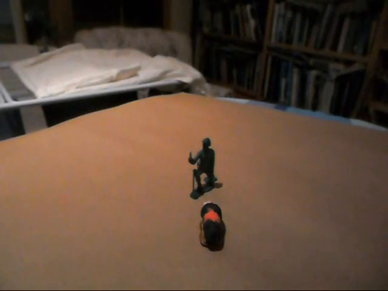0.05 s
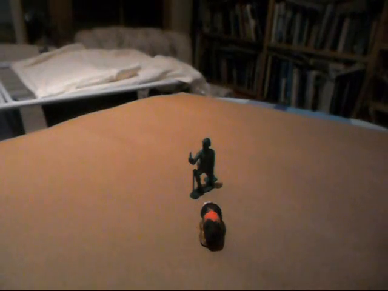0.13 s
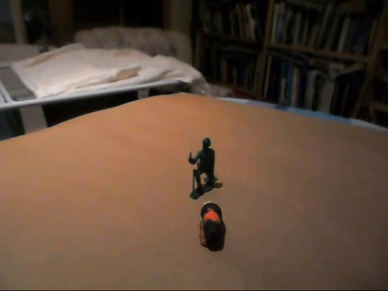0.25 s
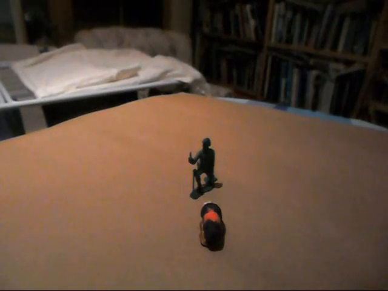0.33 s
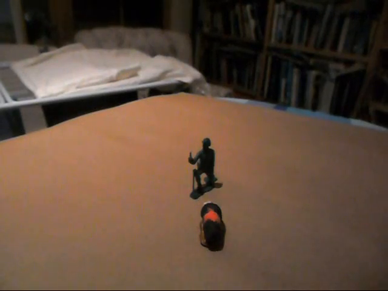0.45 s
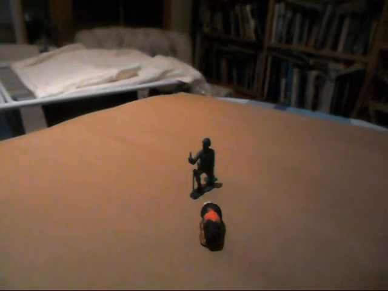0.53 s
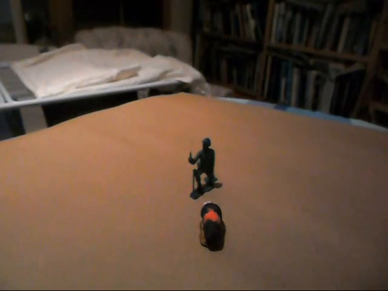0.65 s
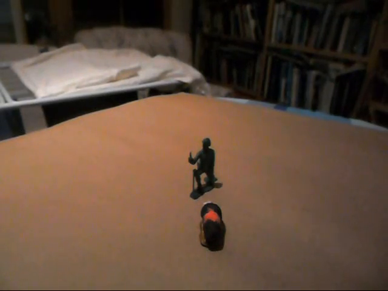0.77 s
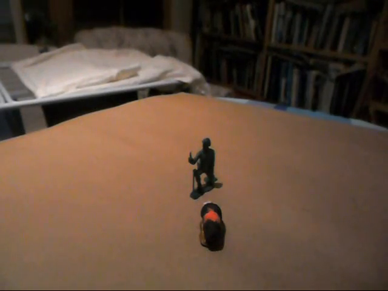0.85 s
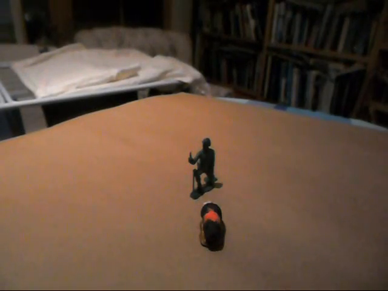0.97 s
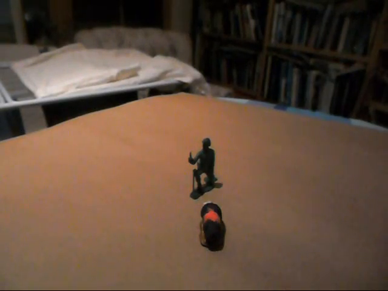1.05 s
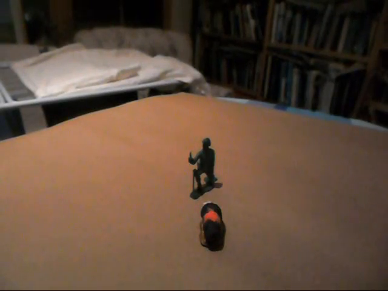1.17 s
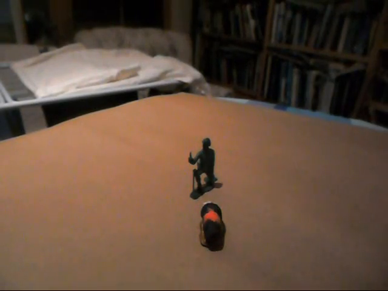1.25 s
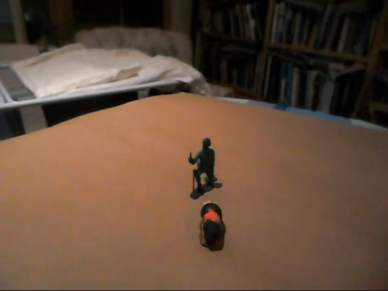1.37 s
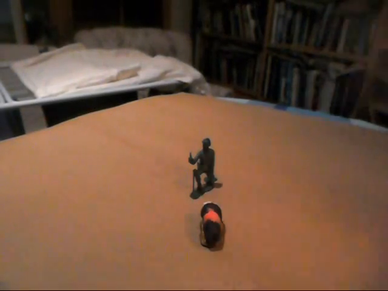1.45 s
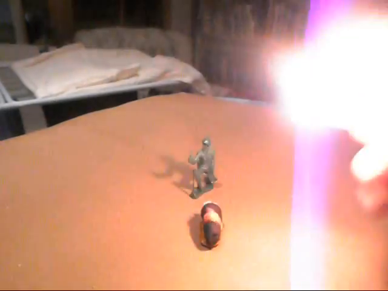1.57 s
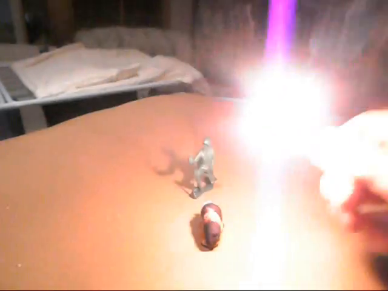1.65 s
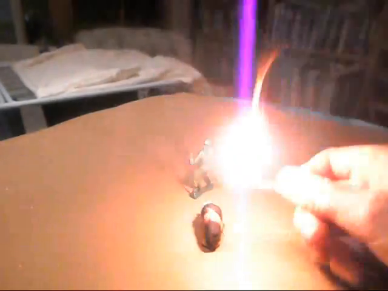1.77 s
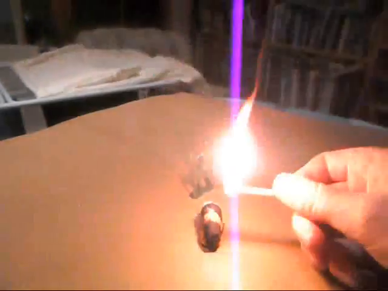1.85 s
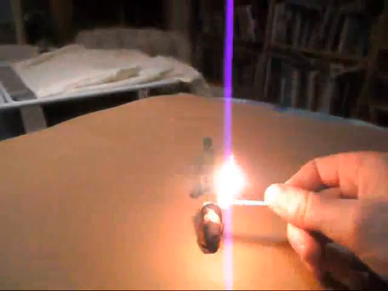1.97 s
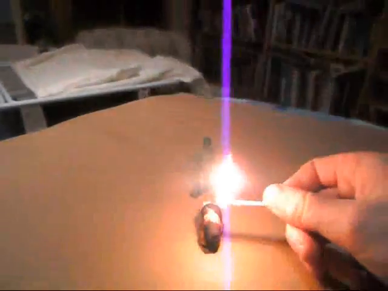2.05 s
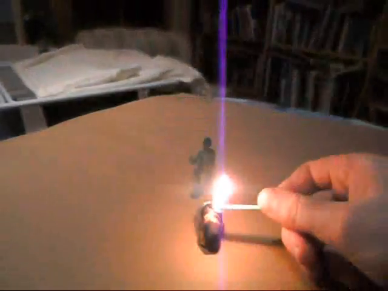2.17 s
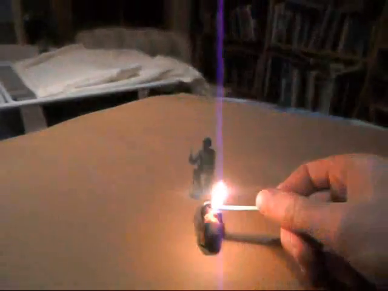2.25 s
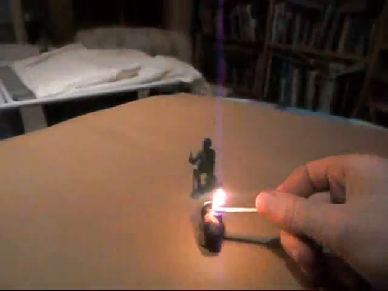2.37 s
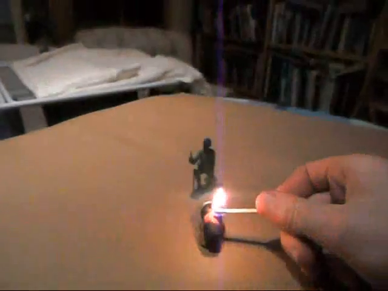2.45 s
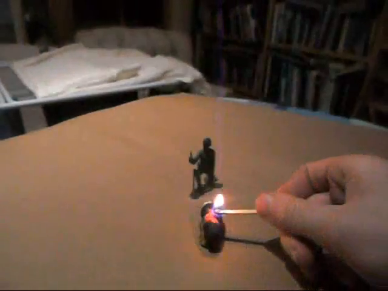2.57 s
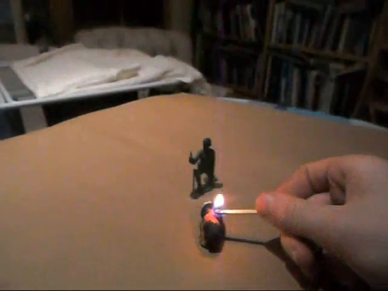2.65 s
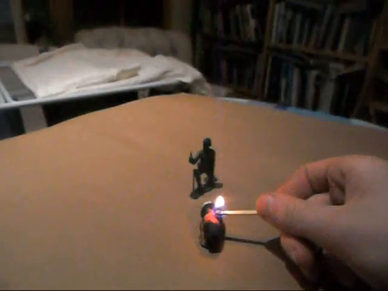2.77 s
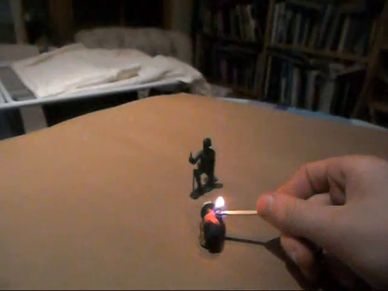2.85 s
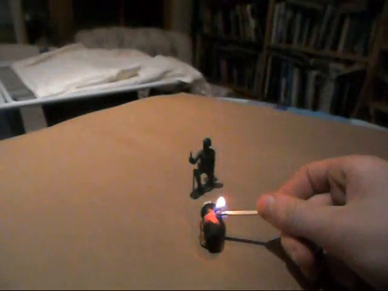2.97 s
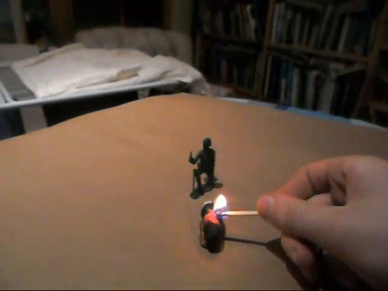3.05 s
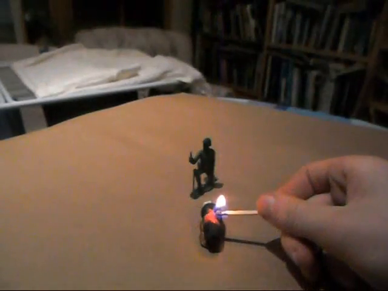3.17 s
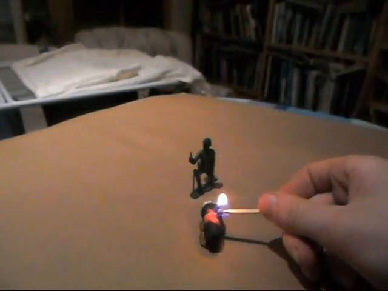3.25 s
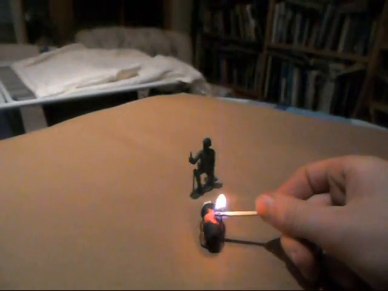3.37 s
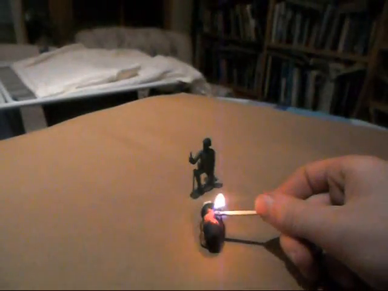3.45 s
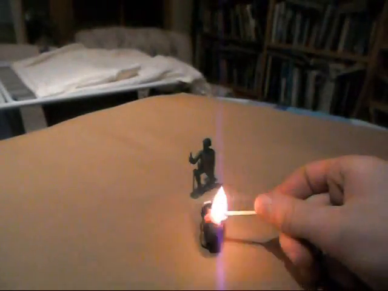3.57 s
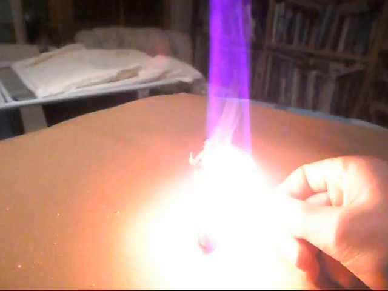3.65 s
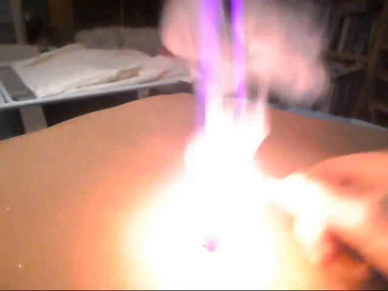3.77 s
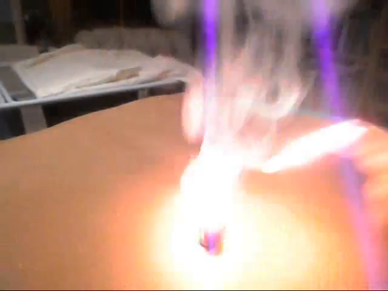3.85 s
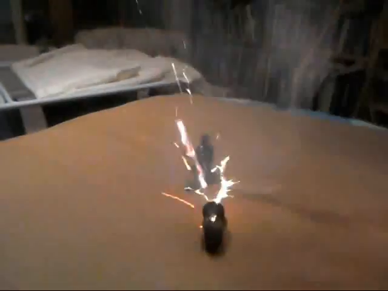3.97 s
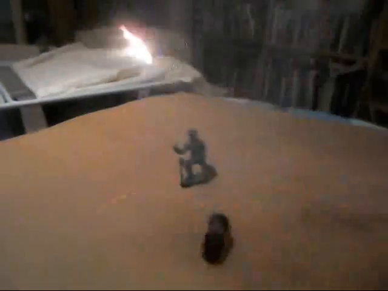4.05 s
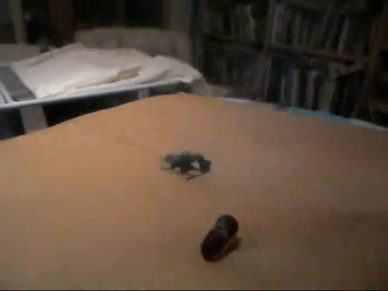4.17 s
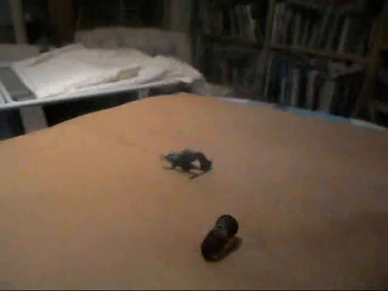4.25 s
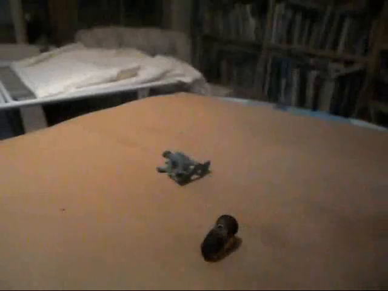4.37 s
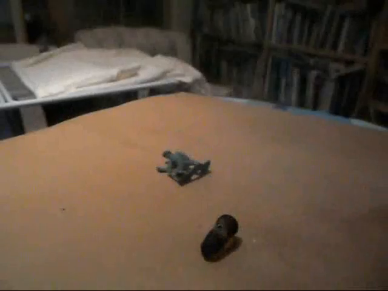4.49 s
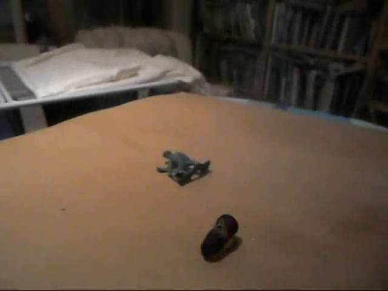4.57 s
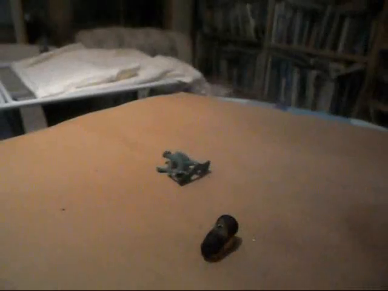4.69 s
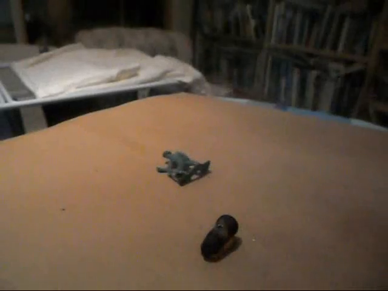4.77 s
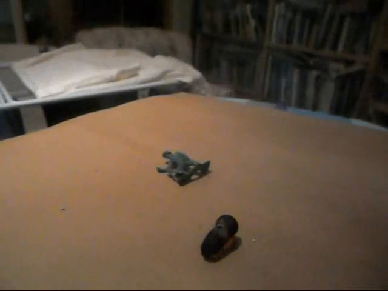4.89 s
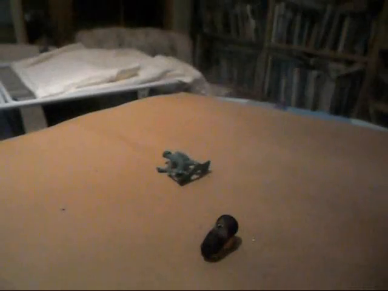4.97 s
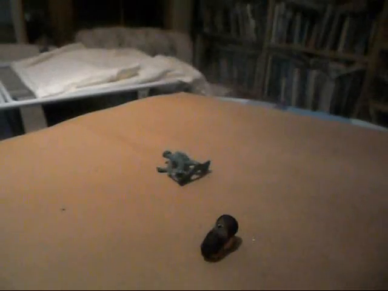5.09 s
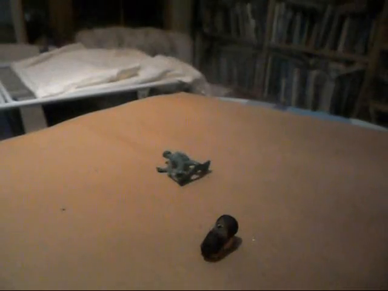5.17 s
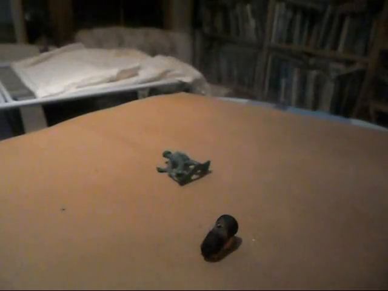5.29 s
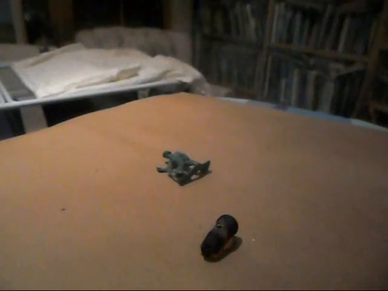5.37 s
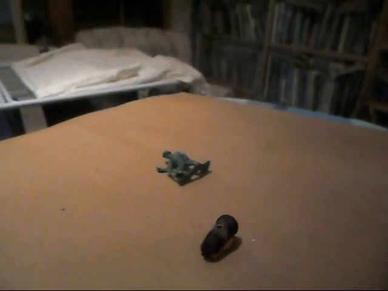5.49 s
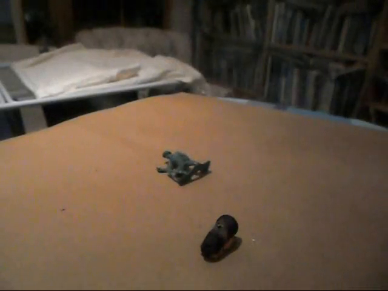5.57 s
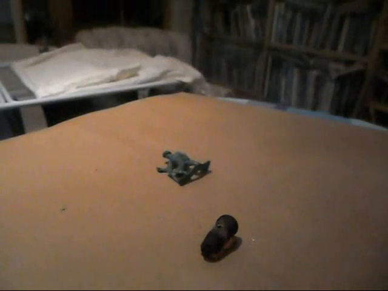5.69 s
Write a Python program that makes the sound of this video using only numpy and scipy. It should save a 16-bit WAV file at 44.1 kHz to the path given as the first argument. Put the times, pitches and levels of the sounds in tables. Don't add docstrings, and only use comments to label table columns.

```python
import sys
import numpy as np
from scipy import signal
from scipy.io import wavfile
from scipy.ndimage import uniform_filter1d

SR = 44100
rng = np.random.default_rng(int(sys.argv[2]) if len(sys.argv) > 2 else 0)


def put_to_file(sound):
    columns = np.atleast_2d(sound).T
    safe = np.clip(columns, -1, 1)
    whole_steps = np.round(safe * 32767)
    wavfile.write(sys.argv[1], SR, whole_steps.astype(np.int16))


def ratio(d):
    e = np.asarray(d, float) / 20
    return 10 ** e


N = 252693
T = np.arange(N) / SR
SHOT_S = 4.07183


def evened(x):
    return x / np.sqrt(np.mean(x ** 2) + 1e-20)


def read(points, hz):
    f, value = np.transpose(points)
    return np.interp(np.log(hz + 1), np.log(f + 1), value)


def along(rows, k, off=-120.):
    rows = np.array(rows)
    return np.interp(T, rows[:, 0], rows[:, k], off, off)


def colour(x, points):
    level = np.log(ratio(read(points, abs(np.fft.fftfreq(4096, 1 / SR)))))
    taps = np.fft.ifft(np.exp(np.conj(signal.hilbert(level)))).real[:2048]
    return signal.oaconvolve(x, taps / np.linalg.norm(taps))[:N]


def resonate(x, hz, width):
    turn = np.exp(2j * np.pi * np.cumsum(hz * np.ones(len(x))) / SR)
    r = np.exp(-np.pi * width / SR)
    return 2 * (turn * signal.lfilter([1 - r], [1, -r], x / turn + 1e-18)).real


def turbulence(lumpy_db, lump_s):
    lumps = uniform_filter1d(rng.standard_normal(N), max(2, round(lump_s * SR)))
    return evened(rng.standard_normal(N) * ratio(lumpy_db * evened(lumps)))


def crackles(per_s, spread_db):
    chance, size = rng.random(N), rng.exponential(1, N)
    sign = rng.choice([-1., 1.], N)
    return (chance < per_s / SR) * sign * ratio(spread_db * np.minimum(size, 2.5))


def sizzle(edge_hz, lumpy_db):
    high_pass = signal.butter(3, edge_hz, "high", fs=SR)
    return evened(signal.lfilter(*high_pass, turbulence(lumpy_db, 0.006)))


def patchy(x, patch_db, wide_hz, long_s):
    z = signal.stft(x, nperseg=512, noverlap=384)[2]
    field = uniform_filter1d(rng.standard_normal(z.shape), max(1, round(wide_hz * 512 / SR)), axis=0)
    field = evened(uniform_filter1d(field, max(1, round(long_s * SR / 128)), axis=1))
    return evened(signal.istft(z * ratio(patch_db * field), nperseg=512, noverlap=384)[1][:len(x)])


def effort(start, top, end, db, power=1.38):
    release_db = -24.5
    rise = np.clip((T - start) / (top - start), 0, 1) ** power
    return rise * ratio(db + release_db * np.maximum(T - top, 0) / (end - top)) * (T < end)


def add(mix, s, sound):
    part = mix[round(s * SR):][:len(sound)]
    part += sound[:len(part)]


def noise_floor():
    # frequency in Hz, level in dB per Hz.
    hiss_tone = [(12, -30.5), (20, 1.5), (38, 0.5), (65, -3.5), (178, -7), (214, -6.5), (293, -7),
                 (471, -10), (7470, -20.5), (9980, -22), (10800, -23), (14000, -64.5), (22000, -120)]
    hiss_db, duck_db, sink_db_per_s = -53.5, -15, -0.25
    gain_db = np.clip((T - SHOT_S) / .02, 0, 1) * (duck_db + sink_db_per_s * (T - SHOT_S))
    return ratio(hiss_db + gain_db) * colour(turbulence(0.43, 0.03), hiss_tone)


def thuds():
    # start in seconds, peak in dB, ring in Hz, t60 in seconds.
    knocks = [
        (1.2473, -30, 290, 0.035),
        (1.849, -41, 114, 0.082),
        (4.264, -38, 90, 0.027),
        (4.282, -49.5, 88.5, 0.051),
        (4.45, -54, 79.6, 0.037),
    ]
    out, t = np.zeros(N), np.arange(4000) / SR
    for s, db, hz, t60 in knocks:
        add(out, s, ratio(db - 60 * t / t60) * np.sin(2 * np.pi * hz * t))
    return out


def snaps():
    # start in seconds, peak in dB, ring in Hz, t60 in seconds.
    clicks = [(0.014, -15, 2520, 0.0068), (0.022, -22.5, 2430, 0.0069), (0.342, -43.5, 2280, 0.017),
              (0.367, -43.5, 2300, 0.019), (0.806, -36, 1050, 0.0093), (1.246, -23.5, 1246, 0.05),
              (1.2488, -23.5, 1080, 0.018), (1.267, -48, 830, 0.012), (3.474, -48, 751, 0.01),
              (4.429, -54, 584, 0.0118), (4.799, -56, 595, 0.012), (4.993, -53, 798, 0.014),
              (5.69, -52.5, 622, 0.016), (5.724, -57, 1000, 0.012), (1.064, -35, 760, 0.0066)]
    edge_level = 0.48
    out, t = np.zeros(N), np.arange(4000) / SR
    for s, db, hz, t60 in clicks:
        edge = resonate(rng.standard_normal(4000), 0.43 * hz, 5000) * ratio(-60 * t / .012)
        ring = -np.sin(2 * np.pi * hz * t) + edge_level * edge
        ring += 0.34 * np.sin(2 * np.pi * 2.4 * hz * t)
        ring += 0.33 * np.sin(2 * np.pi * 1.5 * hz * t)
        add(out, s, ratio(db - 60 * t / t60) * ring * np.minimum(t / 0.0003, 1))
    return out


def matchbox():
    # hardest moment in seconds, rise in seconds, pressure in dB,
    # panel in Hz, freedom of the panel from 0 to 1.
    strokes = [
        (.862, 0.019, -39.5, 1060, 1),
        (1.082, 0.025, -42.5, 941, .66),
        (1.238, .082, -31, 1335, 0.7),
    ]
    # start, hardest moment and end in seconds, pressure in dB, share of rasp from 0 to 1.
    slides = [
        (-.02, 0.0, .12, -38, .35),
        (.143, 0.204, 0.36, -44, .95),
    ]
    # frequency in Hz, width in Hz, level in dB.
    hollows = [(450, 180, -6), (750, 250, -8), (2200, 350, 0), (3200, 600, -6)]
    # frequency in Hz, level in dB per Hz.
    rasp_tone = [(290, -40.5), (500, -9.5), (946, -12), (1940, -6), (2160, -7), (2310, -9), (5500, -15),
                 (8000, -29), (10400, -50), (17600, -120)]
    tray_hz, tray_free = 905, 0.6
    stiffen_hz_per_s = 4900
    let_go_s, slide_power, stroke_rasp = .028, .15, .08

    slips = turbulence(1.8, 0.0019)
    modes = [ratio(db) * resonate(resonate(slips, hz, width), hz, width) for hz, width, db in hollows]
    rasp = colour(turbulence(0.73, 0.0025), rasp_tone)
    panel_hz, free = np.full(N, float(tray_hz)), np.full(N, tray_free)
    for top, rise, db, hz, loose in strokes:
        gripped = (T >= top - rise) & (T < top + let_go_s)
        panel_hz = np.where(gripped, hz - stiffen_hz_per_s * np.maximum(top - T, 0), panel_hz)
        free = np.where(gripped, loose, free)
    panel = resonate(resonate(slips, panel_hz, 590), panel_hz, 440)
    boom = evened(panel + sum(modes[:2])) * np.sqrt(free)
    hollow = boom + evened(sum(modes[2:])) * np.sqrt(1 - free)

    out = np.zeros(N)
    for top, rise, db, *_ in strokes:
        share = 4 * stroke_rasp * (1 - free)
        press = effort(top - rise, top, top + let_go_s, db)
        out += press * (np.sqrt(1 - share) * hollow + np.sqrt(share) * rasp)
    for start, top, end, db, share in slides:
        press = effort(start, top, end, db, slide_power)
        out += press * (np.sqrt(1 - share) * hollow + np.sqrt(share) * rasp)
    return out


def cracks():
    # start in seconds, level in dB, length in seconds.
    bursts = [
        (1.2448, -30, 0.0081),
        (1.2654, -25, 0.0031),
        (3.699, -40.5, 0.0027),
        (3.7034, -33.5, .002),
    ]
    level = sum(ratio(db) * ((T > s) & (T < s + length)) for s, db, length in bursts)
    band = signal.butter(1, [400, 2800], "band", fs=SR)
    return level * evened(signal.lfilter(*band, turbulence(3.3, 0.0005)))


def sparks():
    # start in seconds, peak in dB.
    ticks = [(1.2084, -25), (1.6334, -25.5), (1.6463, -18), (1.6594, -23.5), (1.6803, -31.5),
             (1.6936, -24.5), (1.7205, -28), (1.741, -25), (1.8496, -42), (2.0625, -32.5), (3.4173, -35),
             (1.621, -27.5), (1.6555, -29), (4.2644, -47), (4.374, -44.5)]
    out, t = np.zeros(N), np.arange(4000) / SR
    for s, db in ticks:
        edge = resonate(rng.standard_normal(4000), 2600, 4000)
        tick = 0.62 * np.cos(2 * np.pi * 3000 * t) + 0.9 * edge
        add(out, s, ratio(db - 60 * t / 0.0018) * tick)
    return out


def flare():
    # time in seconds, burn in dB, lag of the table reflection in ms.
    burning = [
        (1.256, -43.5, .44),
        (1.28, -39, .44),
        (1.39, -41.5, .53),
        (1.46, -39.5, .62),
        (1.53, -42.5, 0.52),
        (1.642, -39, 0.44),
        (1.7, -45, .36),
        (1.79, -47.5, 0.2),
        (1.894, -49, 0.18),
    ]
    # frequency in Hz, level in dB per Hz.
    flare_tone = [(35, -34.5), (60, -12.5), (280, 2.5), (450, -3.5), (720, 4.5), (1240, -1), (3300, 1),
                  (6010, -2), (9750, -30.5), (16500, -120)]
    sizzle_db, sizzle_slope = -4.5, .75
    flash_db, flash_t60_s = -34, .07
    table_bounce, fade_ms = 0.58, 0.38

    lit, burn_db, lag_ms = np.maximum(T - burning[0][0], 0), along(burning, 1), along(burning, 2, 0)
    gas = turbulence(1.5, .005) + 2.4 * crackles(160, 4.0)
    reflected = np.interp(np.arange(N) - lag_ms * SR / 1000, np.arange(N), gas)
    gas = gas + table_bounce / (1 + lag_ms / fade_ms) * reflected
    gas = patchy(gas, 2.2, 600, .04)
    spit = ratio(sizzle_db - 42.5 + sizzle_slope * (burn_db + 41.5))
    spit += ratio(flash_db - 60 * lit / flash_t60_s) * (lit > 0)
    return ratio(burn_db + 2.08) * colour(gas, flare_tone) + spit * sizzle(5500, 2.2)


def flutter():
    # start, strongest moment and end in seconds, level in dB.
    puff = (3.43, 3.49, 3.6, -43)
    # frequency in Hz, level in dB per Hz.
    flutter_tone = [(47, -44), (80, 1), (253, -14), (323, 1.5), (627, -18.5), (767, -19), (1070, -25),
                    (2500, -25), (3250, -36), (5500, -120)]
    return effort(*puff) * colour(turbulence(1.1, 0.029), flutter_tone)


def jet():
    # time in seconds, roar in dB.
    roaring = [
        (3.708, -37.5),
        (3.738, -30.5),
        (3.8, -32),
        (3.836, -37),
        (3.916, -35.5),
        (4.032, -43),
        (4.07, -31),
        (4.074, -46),
        (4.085, -55.5),
    ]
    # frequency in Hz, level in dB per Hz.
    jet_tone = [(40, -42.5), (120, -4), (280, -3.5), (700, 0.5), (1500, -3.5), (2200, -6), (3300, -5),
                (4200, -9), (4700, -19.5), (5500, -32.5), (11000, -59)]
    sizzle_db, sizzle_slope, heat_s = -2.5, 1, .05
    gas = patchy(turbulence(2.5, .003) + 1.9 * crackles(603, 3.3), 2.0, 600, 0.089)
    roar_db = along(roaring, 1)
    heat = 1 - .5 * np.exp(-np.maximum(T - roaring[0][0], 0) / heat_s)
    spit = heat * ratio(sizzle_db - 35 + sizzle_slope * (roar_db + 33))
    return ratio(roar_db) * colour(gas, jet_tone) + spit * sizzle(5200, 2.2)


def blast():
    before, after = np.maximum(SHOT_S - T, 0), np.maximum(T - SHOT_S, 0)
    swell = 9 * np.exp(-before / .00055) * (1 + .13 * resonate(rng.standard_normal(N), 3500, 6000))
    suction = np.minimum(8.6 * np.exp(-after / .00027), 1.1) + .45 * np.exp(-after / .0033)
    suction += .85 * np.exp(-((after - .0018) / .00036) ** 2)
    barrel = .15 * np.exp(-after / .005) * np.cos(2 * np.pi * 710 * (after - .0006))
    collapse = .5 + .5 * np.tanh((T - SHOT_S) / .00008)
    return (1 - collapse) * np.minimum(swell, 1.5) - collapse * (suction + barrel)


def shot():
    # delay in seconds, level in dB, sign.
    echoes = [
        (.0118, -13, 1),
        (.0124, -18, -1),
        (.015, -11, -1),
        (.0179, -14, -1),
        (.0191, -15, -1),
    ]
    # frequency in Hz, level in dB per Hz.
    room_tone = [(40, -11.5), (130, -4), (290, 2), (700, -3.5), (1200, -9.5), (2000, -20), (3500, -21),
                 (6000, -27.5), (10500, -31)]
    # frequency in Hz, t60 in seconds.
    decay = [(60, 0.34), (150, .24), (280, 0.26), (500, 0.3), (1000, 0.32), (2500, 0.37), (5000, 0.26),
             (10000, 0.27)]
    out = blast()
    u = np.arange(400) / SR / .00007
    pulse = 1.8 * u ** 2 * np.exp(-u) * (1 - .12 * u)
    for delay, db, sign in echoes:
        add(out, SHOT_S + delay - .0002, sign * ratio(db) * pulse)
    diffuse = patchy(colour(turbulence(0.86, 0.0024), room_tone)[:SR], 1.4, 150, 0.098)
    hz, t, z = signal.stft(diffuse, SR, nperseg=256)
    t60 = read(decay, hz)[:, None]
    fall = ratio(-60 * t / t60) + ratio(-18.0 - 60 * t / (2.0 * t60))
    tail = signal.istft(z * fall, SR, nperseg=256)[1]
    build = np.clip(np.arange(len(tail)) / SR / 0.016, 0, 1) ** 3.5
    add(out, SHOT_S, ratio(-21.0) * build * tail)
    return out


def scene():
    near = matchbox() + snaps() + sparks() + thuds() + flare() + cracks() + flutter() + jet()
    t = np.arange(SR // 4) / SR
    tail = rng.standard_normal(len(t)) * ratio(-60 * t / 0.67) * (t > .006)
    tail /= np.linalg.norm(tail)
    near = near + ratio(-12.5) * signal.oaconvolve(near * (T < SHOT_S), tail)[:N]
    return (near + noise_floor() + shot())[None]


def band_limit(x):
    return signal.sosfilt(signal.butter(12, 15520, fs=SR, output="sos"), x)


def record(dry):
    # frequency in Hz, level in dB per Hz.
    rumble_tone = [(15, -19.5), (25, 2.5), (50, -9.5), (90, -19.5), (200, -52)]
    dry = dry + ratio(-71) * colour(turbulence(2.4, 0.043), rumble_tone)
    knee = 1.1 * dry / (1 + abs(dry) ** 8) ** (1 / 8)
    slope = np.sqrt(abs(uniform_filter1d(np.diff(knee, prepend=0) ** 2, size=300)))
    gritty = knee + ratio(-5.5) * np.minimum(slope, .012) * rng.standard_normal(N)
    low_pass = signal.firwin(91, 10720, window=("kaiser", 2.5), fs=SR)
    limited = signal.oaconvolve(gritty, low_pass[None], "same")
    every_second = np.kron(limited[:, ::2], [1, 0])
    held = signal.lfilter([-.04, 1.04, 1.04, -.04], [1], every_second)[:, :N]
    return band_limit(np.clip(held, -1.06, 1.06))


dry = scene()
out = record(dry)
put_to_file(out)
```